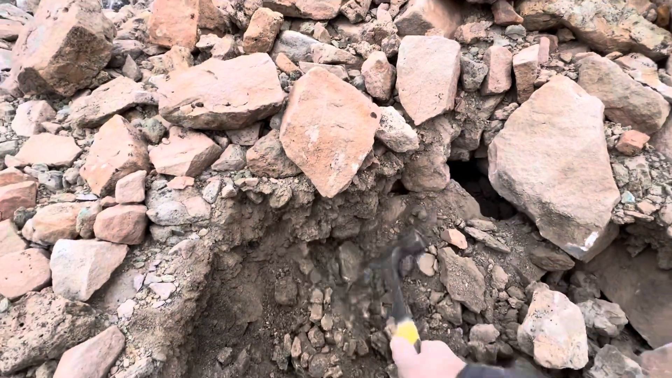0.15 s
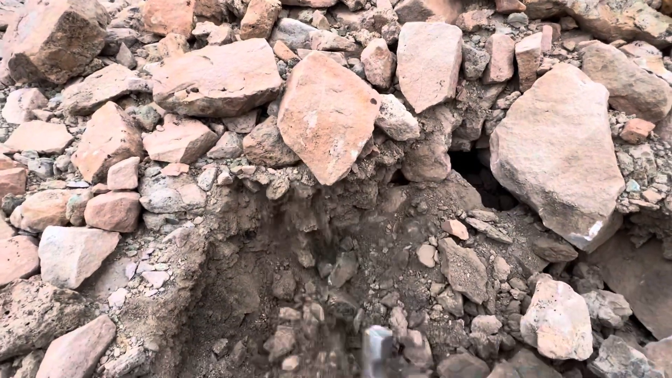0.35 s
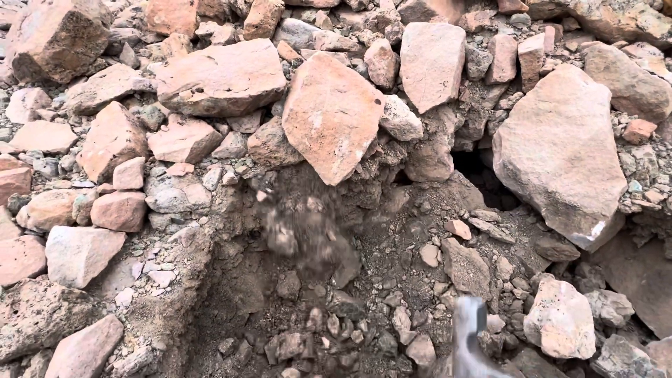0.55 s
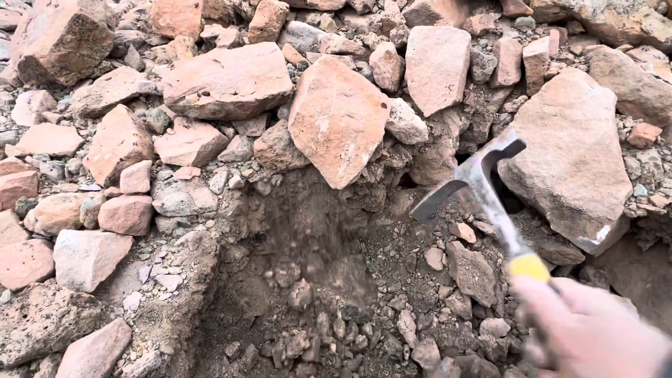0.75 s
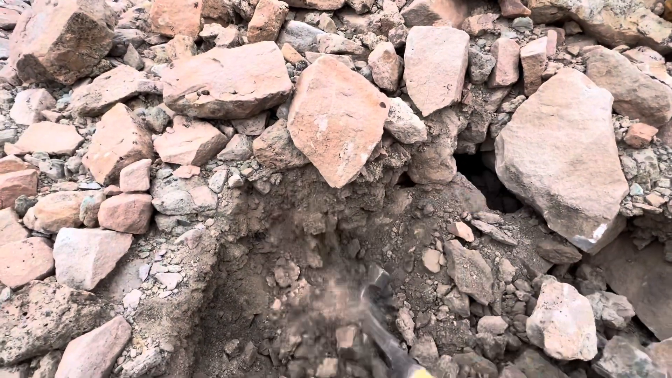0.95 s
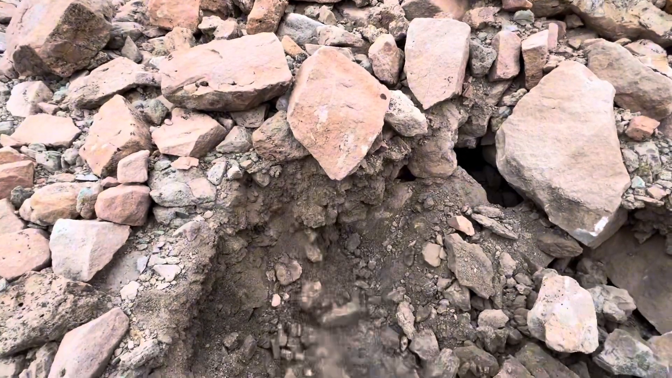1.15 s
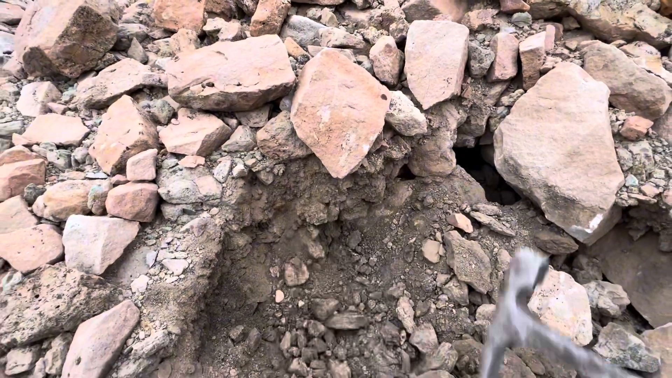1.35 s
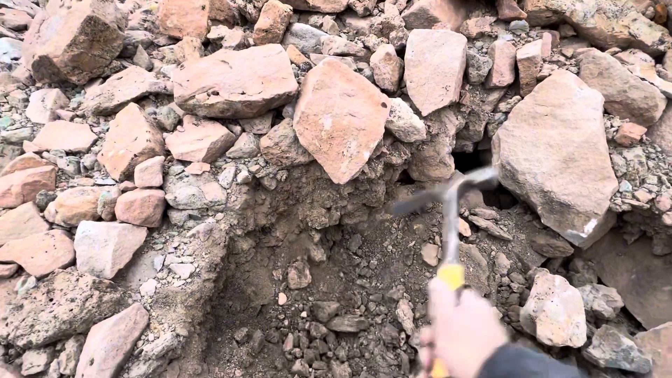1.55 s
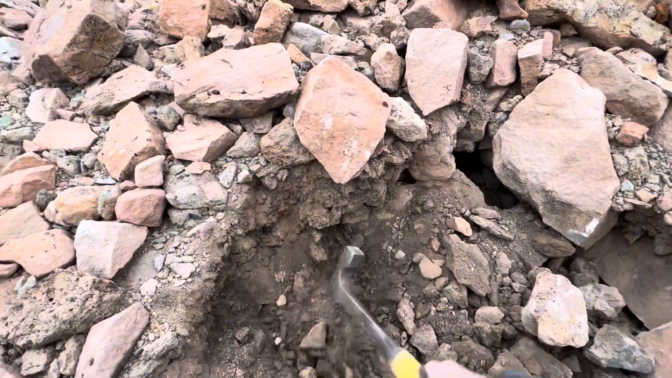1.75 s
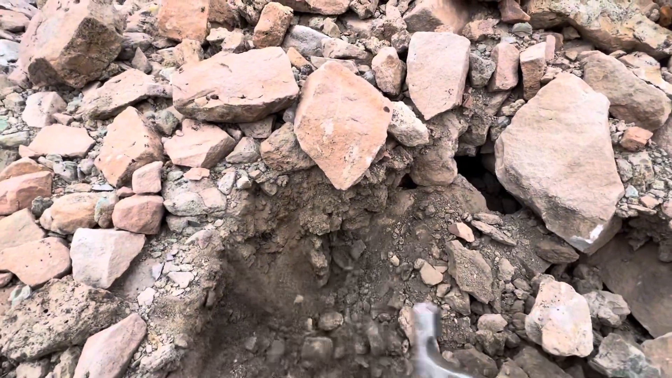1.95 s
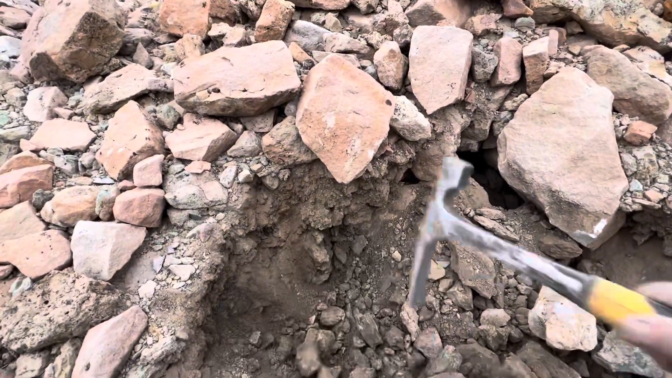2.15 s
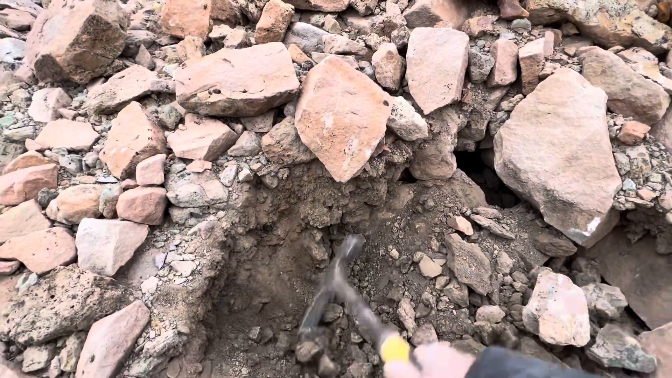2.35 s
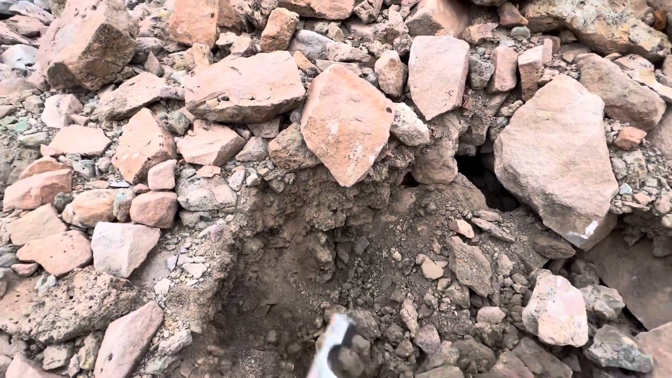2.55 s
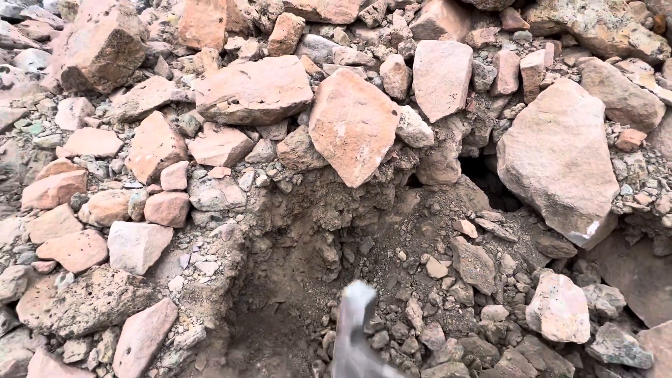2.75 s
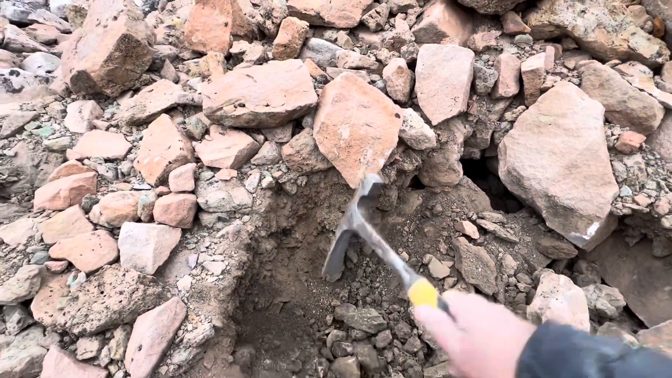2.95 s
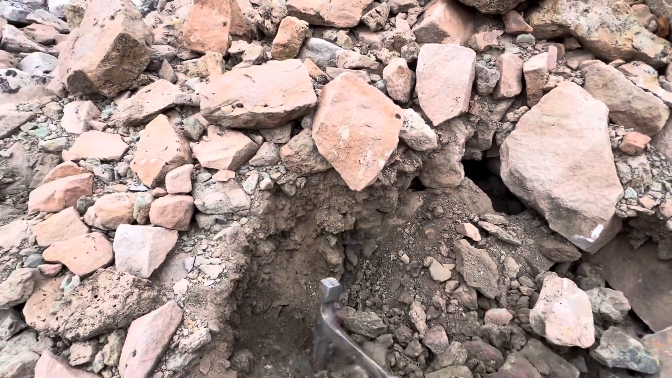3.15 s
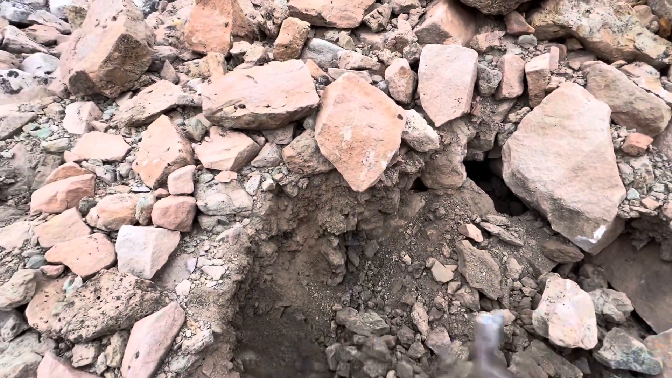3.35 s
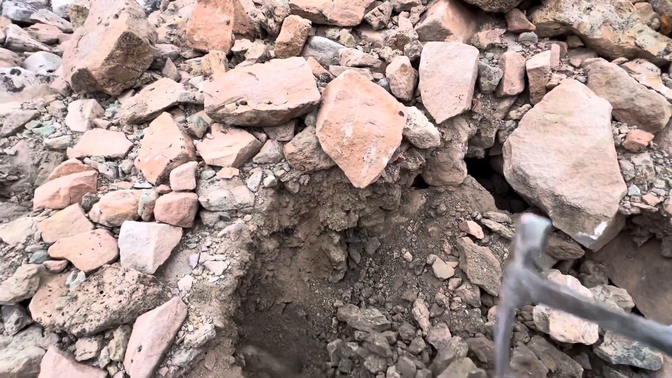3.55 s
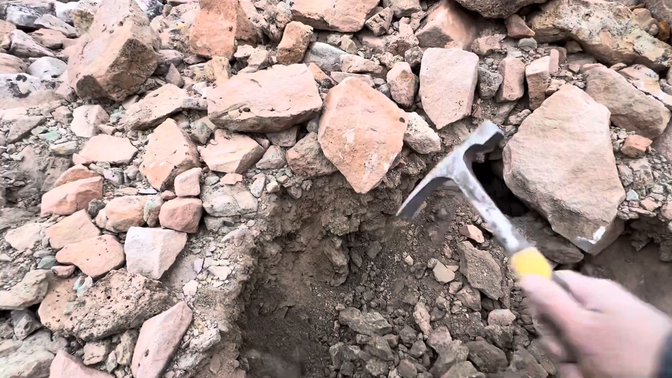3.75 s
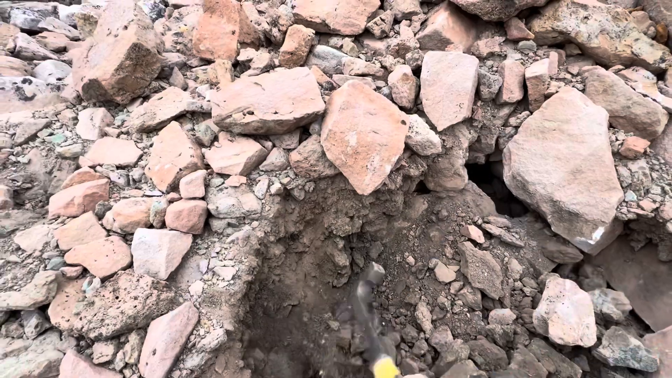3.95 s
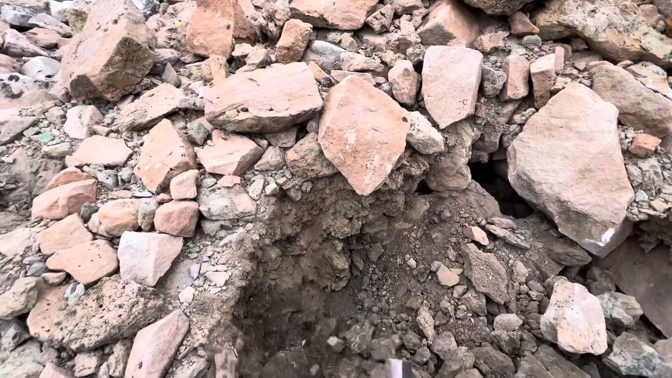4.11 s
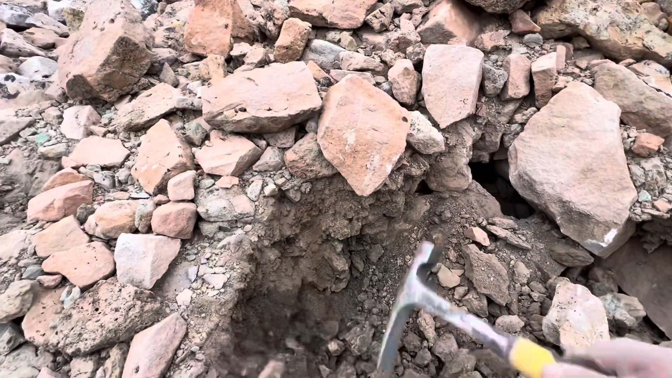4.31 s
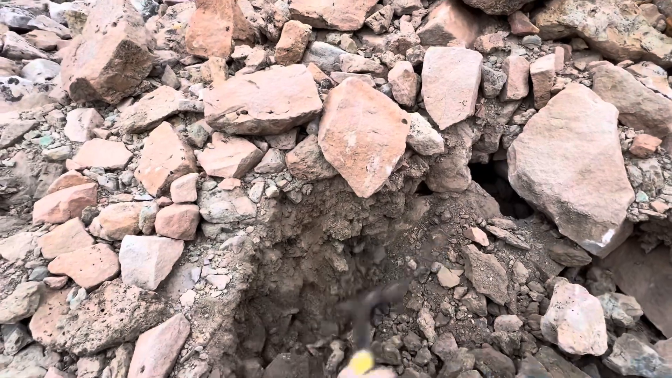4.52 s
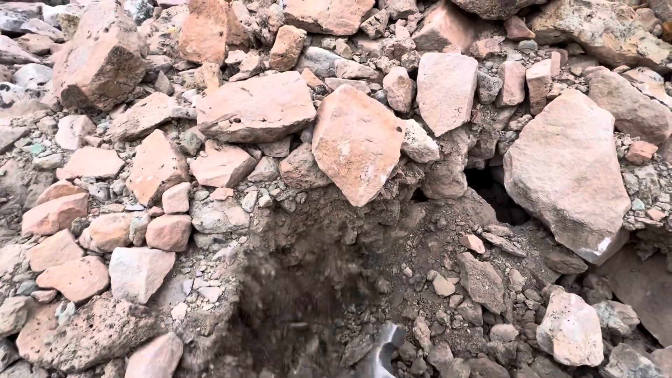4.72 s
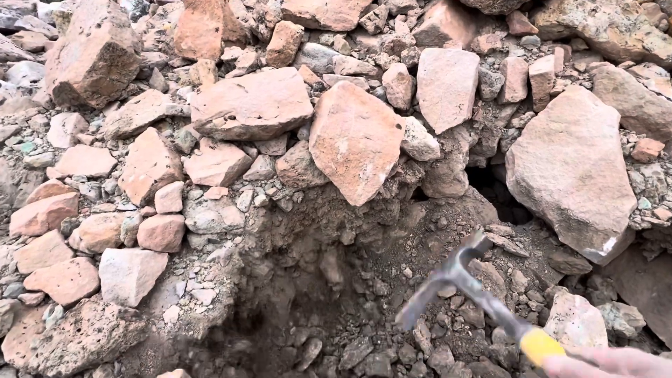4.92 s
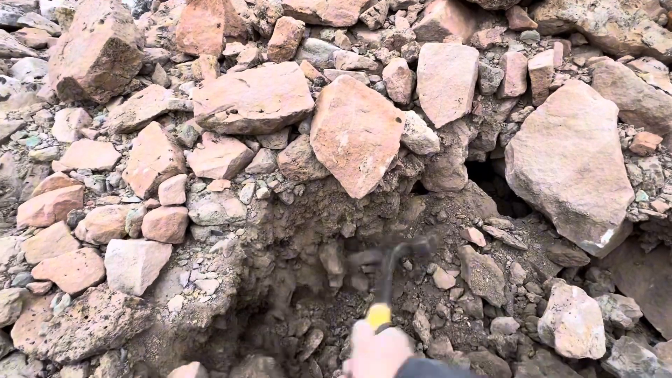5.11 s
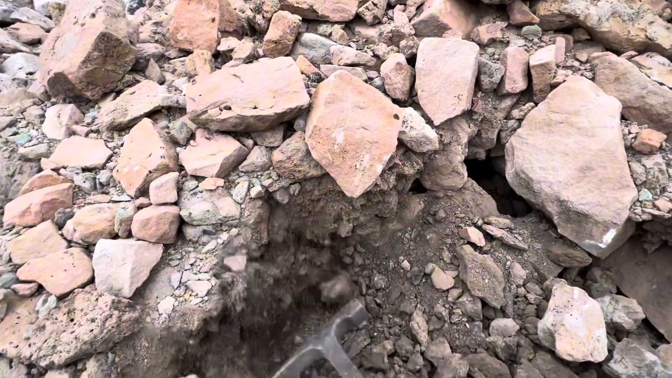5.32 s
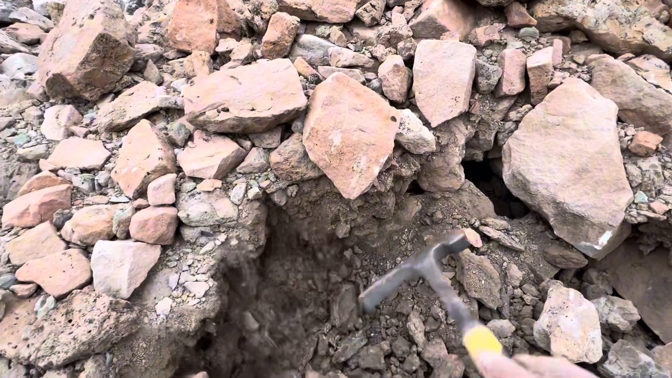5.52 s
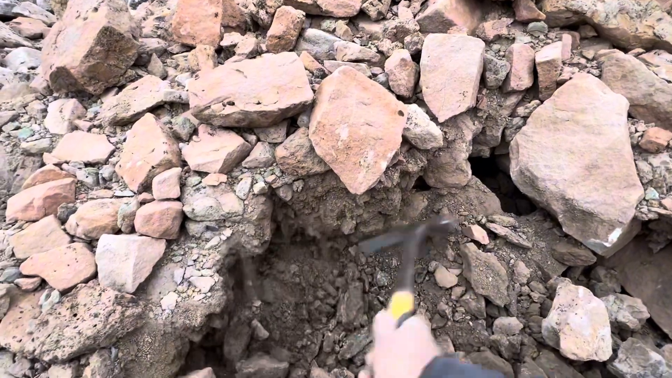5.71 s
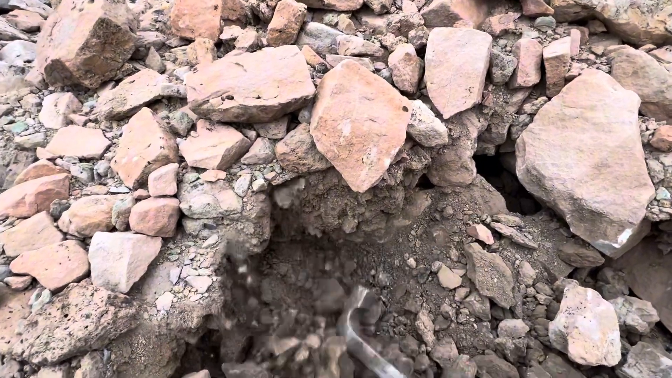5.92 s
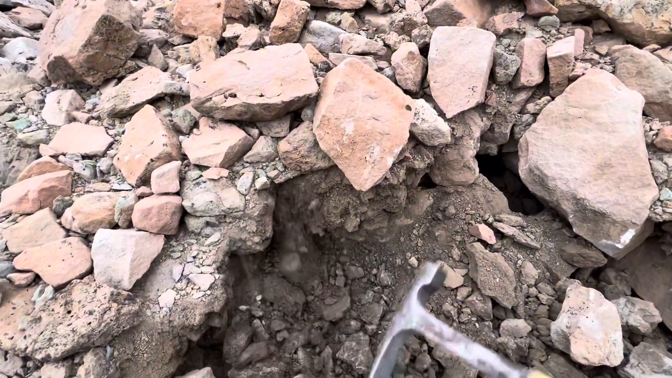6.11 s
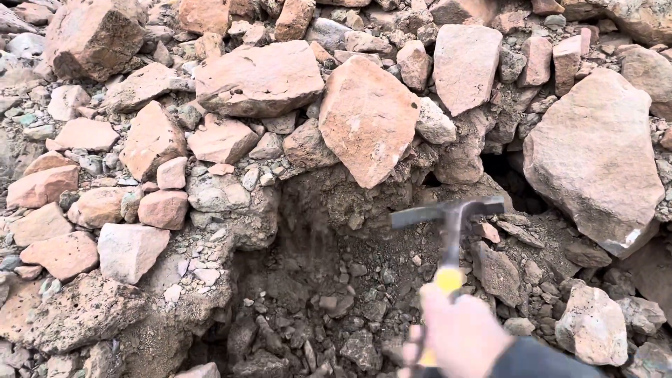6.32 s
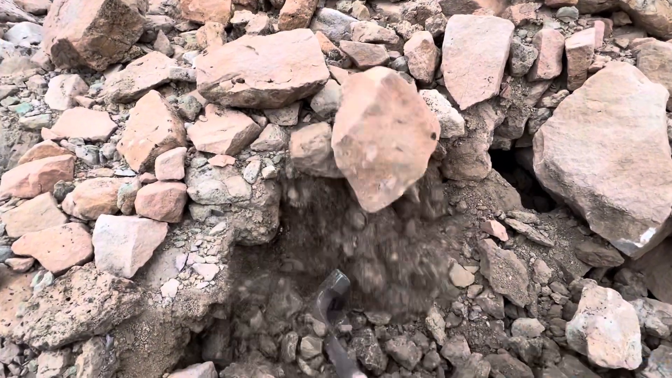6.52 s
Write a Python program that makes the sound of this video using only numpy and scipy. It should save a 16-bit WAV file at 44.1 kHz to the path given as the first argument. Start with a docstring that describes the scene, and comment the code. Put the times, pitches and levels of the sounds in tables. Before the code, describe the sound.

A hand pick digs at stony ground in steady rhythm, heard close and dry. Every blow bites with a hard crack of stone and crunching grit over a soft, sagging thud; the steel head rings only briefly. Dragging scrapes follow, and small slides of gravel and stray pebbles patter down before the next hit. The open air adds only a faint, even hiss, with no echo.

```python
"""Hand pick in stony soil

A steel hand pick chops into stony soil close to a phone, outdoors: each swing crunches in, thuds and is dragged back.
Crunches and running gravel are swarms of tiny damped wavelets mixed with noise; stone clicks and thuds are decaying
sines that drop in pitch. Click taps and crunch forces drive the ringing modes of the pick head. Loosened gravel
trickles down the bank in slides, with stray pebble clicks, over a faint outdoor hiss."""
import sys
import numpy as np
from scipy import signal
from scipy.fft import rfft, irfft, next_fast_len
from scipy.io import wavfile
from scipy.ndimage import map_coordinates

SR = 44100
rng = np.random.default_rng(int(sys.argv[2]) if len(sys.argv) > 2 else 0)


def put_to_file(sound):
    """Save the sound as 16-bit audio at rate SR, in the file named by the first command-line argument."""
    columns = np.atleast_2d(sound).T  # one column per channel
    safe = np.clip(columns, -1, 1)
    whole_steps = np.round(safe * 32767)
    wavfile.write(sys.argv[1], SR, whole_steps.astype(np.int16))


N = 289737

# tone of coarse stone grit: frequency_hz [Hz], gain_db [dB]
GRIT_TONE = [(350, -22), (600, -3), (1200, 0), (2500, -0.5), (4500, 0.5), (6000, -28.5)]
# tone of fine, hissing dust: frequency_hz [Hz], gain_db [dB]
DUST_TONE = [(3500, -15), (5000, 2), (7000, 6), (9000, 3), (12000, -0.5), (16000, -9)]


def amp(db):
    """Linear amplitude for a level in dB."""
    return 10 ** (np.asarray(db) / 20)


def unit(x):
    """x scaled to an rms of 1."""
    return x / np.sqrt(np.mean(x ** 2) + 1e-20)


def filtered(x, response):
    """x times a response given as a function of frequency in Hz."""
    size = next_fast_len(N + SR // 2, True)
    spectrum = rfft(x, size) * response(np.fft.rfftfreq(size, 1 / SR))
    return irfft(spectrum, size)[..., :N]


def coloured(x, points):
    """x through a causal minimum-phase filter drawn through (Hz, dB) points."""
    hz, db = np.transpose(points)
    grid = np.fft.rfftfreq(8192, 1 / SR)
    gain_db = np.interp(np.log(grid + 1), np.log(hz), db)
    # folding the cepstrum forward in time makes the filter causal
    cepstrum = irfft(np.log(amp(gain_db)))
    half = len(cepstrum) // 2
    cepstrum[1:half] *= 2
    cepstrum[half + 1:] = 0
    impulse = irfft(np.exp(rfft(cepstrum)))
    return signal.fftconvolve(x, impulse)[:N]


def wobble(rate):
    """A smooth random curve through rate knots a second."""
    knots = rng.standard_normal(int(N * rate / SR) + 4)
    return map_coordinates(knots, [np.arange(N) * rate / SR])


def grains(count, spread_db, cycles, noise):
    """Tiny stone contacts, each a short damped wavelet of random pitch and size, on a share of plain noise; rms 1."""
    when, pitch, size, sign = rng.random((count, 4)).T
    hz = 400 * 40 ** pitch[:, None]  # 400 Hz to 16 kHz
    t = np.arange(96) / SR
    wavelet = np.sqrt(hz) * np.cos(2 * np.pi * hz * t) * np.exp(-hz * t / cycles)
    strength = amp(-spread_db * np.log(size + 0.032)) * np.sign(sign - 0.5)
    wavelet *= strength[:, None]
    index = (when * N).astype(int)[:, None] + np.arange(len(t))
    patter = np.bincount(index.ravel(), wavelet.ravel(), N + len(t))[:N]
    return unit(unit(patter) + noise * rng.standard_normal(N))


def flows_db():
    """Levels of patter, dust and rumble: each swing sets loose a slide that rises, holds and dies away."""
    # loose gravel running down the bank: full_flow_s [s], hold_s [s], level_db [dB], fall_db_per_s [dB/s],
    # dust_db and rumble_db [dB against the patter]
    slides = [(0.214, 0.19, -36, 45, 0.5, -9), (1.06, 0.15, -41.5, 31, 0.5, -5.5),
              (1.755, 0.11, -37.5, 64, -2, -3), (2.44, 0.12, -39.5, 42, -1, -2.5),
              (3.166, 0.052, -40, 21, -1.5, -3.5), (3.97, 0.02, -41.5, 51, 2.5, -3),
              (4.58, 0.34, -41, 55, 1, -5.5), (5.152, 0.24, -42.5, 73, 1.5, -3.5),
              (5.847, 0.067, -34.5, 50, 0, -8), (6.462, 0.049, -36, 40, -4, -7)]
    # what still runs between slides: patter_db, dust_db, rumble_db [dB]
    settled = [-58, -51, -64]
    rise_db_per_s, dust_lag_s, rumble_lead_s = 90, 0.032, 0.023
    t = np.arange(N) / SR - np.array([[0], [dust_lag_s], [-rumble_lead_s]])
    power = amp(settled)[:, None] ** 2
    for full_flow_s, hold_s, level_db, fall_db_per_s, dust_db, rumble_db in slides:
        rise_db = rise_db_per_s * np.maximum(full_flow_s - t, 0)
        fall_db = fall_db_per_s * np.maximum(t - full_flow_s - hold_s, 0)
        balance_db = np.array([[0], [dust_db], [rumble_db]])
        power = power + amp(level_db - rise_db - fall_db + balance_db) ** 2
    return 10 * np.log10(power)


def trickle():
    """Gravel and a few larger pebbles patter over a hiss of dust and a lumpy rumble of sliding soil."""
    # tone of sliding soil: frequency_hz [Hz], gain_db [dB]
    rumble_tone = [(35, -26), (70, -3), (140, -2), (300, -5.5), (600, -15.5), (900, -27)]
    patter_db, dust_db, rumble_db = flows_db()
    gravel = grains(count=12000, spread_db=3, cycles=1.2, noise=1.0)
    pebbles = grains(count=600, spread_db=6.5, cycles=1.1, noise=0)
    lumps = wobble(35)  # shared, so all three layers surge together

    patter_db = patter_db + 2.17 * lumps + 1.4 * wobble(100)
    patter = amp(patter_db) * unit(coloured(gravel + 0.34 * pebbles, GRIT_TONE))
    dust_db = dust_db + 1.2 * lumps + 1.6 * wobble(90)
    hiss = amp(dust_db) * unit(coloured(gravel + 0.4 * pebbles, DUST_TONE))
    rumble_db = rumble_db + 3.9 * lumps + 1.85 * wobble(17)
    rumble = amp(rumble_db) * unit(coloured(rng.standard_normal(N), rumble_tone))
    return patter + hiss + rumble


def air():
    """A faint even outdoor hiss: steady coloured noise."""
    # tone of the open air: frequency_hz [Hz], gain_db [dB]
    air_tone = [(40, -10), (130, 7), (470, -18), (1300, -9), (4600, -5), (8300, -10), (16000, -0.5)]
    return amp(-50) * unit(coloured(rng.standard_normal(N), air_tone))


def strays(count):
    """Rows of pebble clicks at random moments, louder while more gravel runs."""
    loudest_db, range_db = -25, 6.5  # loudest click at the mean flow level
    growth = 0.86  # dB louder for each dB more gravel
    lowest_hz, pitch_ratio, ring_db = 1200, 6, -28
    patter_db = flows_db()[0]
    ceiling_db = loudest_db + growth * (patter_db - patter_db.mean())
    rows = []
    for when, size, pitch in rng.random((count, 3)):
        level_db = ceiling_db[int(when * N)] - range_db * size
        rows.append((when * N / SR, level_db, lowest_hz * pitch_ratio ** pitch, ring_db, "flat"))
    return rows


def clicks():
    """A stone clicks for a cycle or two, its pitch dropping, sheds a puff of grit and taps the steel."""
    # single stone clicks: start_s [s], level_db [relative dB], pitch_hz [Hz, where the drop settles],
    # ring_db [dB of steel tap against the click], side of the head that is met
    stone_clicks = [(0.031, -18, 3300, -23, "flat"), (0.119, -14, 2480, -17, "edge"),
                    (0.149, 4, 2070, -21, "flat"), (0.2313, -13, 2020, -20, "flat"),
                    (0.354, -15, 2490, -18.5, "edge"), (0.4199, -13, 1620, -24, "flat"),
                    (0.481, -22, 3000, -14, "flat"), (0.5745, -13, 1630, -23, "flat"),
                    (0.6927, -15.5, 1200, -34, "flat"), (0.8065, -20.5, 3700, -27.5, "flat"),
                    (0.8278, -19, 6800, -19, "edge"), (0.8395, -2.5, 2930, -21, "edge"),
                    (0.8487, -2.5, 950, -18, "flat"), (1.1067, -4.5, 1760, -28, "edge"),
                    (1.2652, -12, 2820, -18, "edge"), (1.3491, -15.5, 3600, -29, "flat"),
                    (1.358, -21, 1410, -25, "flat"), (1.4438, -21, 2170, -34, "flat"),
                    (1.6106, -18, 2480, -30, "flat"), (1.8283, -7, 2720, -10, "flat"),
                    (1.927, -10, 4040, -15, "flat"), (2.0272, -20, 1600, -17, "flat"),
                    (2.052, -18, 1450, -18, "flat"), (2.0655, -25, 3200, -19, "edge"),
                    (2.1587, -19.5, 5700, -35, "flat"), (2.1966, -23.5, 3080, -30, "flat"),
                    (2.2228, -16.5, 8200, -41, "flat"), (2.2292, -24, 1910, -31, "flat"),
                    (2.2727, -26.5, 3260, -28, "flat"), (2.3409, 3, 2880, -39, "flat"),
                    (2.3697, -5, 1050, -22, "edge"), (2.3736, -4, 1780, -20, "flat"),
                    (2.3998, -11, 5560, -23, "flat"), (2.485, -7.5, 3030, -7, "flat"),
                    (2.5183, -1.5, 2620, -37, "flat"), (2.5946, -19, 1950, -28, "flat"),
                    (2.608, -18, 5300, -25, "flat"), (2.7044, -17.5, 3700, -15.5, "flat"),
                    (2.771, -26, 2000, -30, "flat"), (2.8101, -17.5, 1200, -19, "flat"),
                    (2.825, -27, 1070, -36, "flat"), (2.889, -25, 790, -36, "flat"),
                    (3.0424, -12, 3500, -27, "flat"), (3.0458, -8, 3800, -13, "flat"),
                    (3.0622, 6.5, 3100, -27, "flat"), (3.1965, -12.5, 3330, -33, "flat"),
                    (3.324, -12, 3100, -19, "edge"), (3.331, -3.5, 3700, -21, "edge"),
                    (3.377, -3, 3750, -22, "edge"), (3.402, -11.5, 2300, -9, "flat"),
                    (3.5124, -20.5, 1490, -28, "flat"), (3.519, -18, 2780, -22, "flat"),
                    (3.555, -12, 5900, -37, "flat"), (3.629, -22.5, 940, -29, "flat"),
                    (3.673, -24.5, 2100, -21.5, "flat"), (3.715, -21.5, 2540, -21, "flat"),
                    (3.8764, -10, 2520, -4.5, "flat"), (3.8932, -7.5, 1360, -16, "flat"),
                    (4.0826, -15, 5800, -21, "flat"), (4.0925, -7.5, 2430, -4.5, "flat"),
                    (4.1075, -16, 2770, -53, "flat"), (4.2998, -24, 7400, -23, "flat"),
                    (4.4905, -9, 1900, -15, "flat"), (4.508, -16, 2830, 1, "flat"),
                    (4.5268, 3, 2070, -21, "flat"), (4.579, -14, 2170, -16, "flat"),
                    (4.611, -10, 1860, -37, "flat"), (4.6617, -16, 2420, -11, "flat"),
                    (4.7462, -25.5, 3240, -8.5, "edge"), (4.7731, -15.5, 2280, -39, "flat"),
                    (4.8203, -17.5, 2300, -30, "flat"), (4.8992, -20, 3500, -23, "flat"),
                    (4.939, -10.5, 850, -39, "flat"), (5.0555, -19.5, 2110, -26, "flat"),
                    (5.097, -11, 2300, -9, "flat"), (5.107, 0.5, 2530, -10, "flat"),
                    (5.132, -10, 1800, -21, "flat"), (5.215, -10, 2740, -3.5, "flat"),
                    (5.2458, -14.5, 2350, -1.5, "flat"), (5.2924, -11.5, 2370, -9, "flat"),
                    (5.3055, -11, 2180, -27, "edge"), (5.3945, -18.5, 2700, -21, "flat"),
                    (5.4337, -17, 1850, -37, "flat"), (5.682, -24, 2550, -30, "flat"),
                    (5.7215, -4, 3680, -6.5, "flat"), (5.734, -4.5, 2030, -22, "flat"),
                    (5.8175, -3.5, 710, -24, "flat"), (5.987, -4.5, 1510, -42, "flat"),
                    (6.0071, -10.5, 1450, -27, "edge"), (6.0447, -4, 5900, -28, "flat"),
                    (6.1043, -18, 1580, -34, "flat"), (6.1228, -21, 1010, -36, "flat"),
                    (6.2595, -17, 5250, -40, "flat"), (6.3139, -5.5, 2430, -15.5, "flat"),
                    (6.3766, -3, 5100, -29, "edge"), (6.3985, 3, 5970, -34, "flat"),
                    (6.3984, 6, 4600, -15.5, "flat"), (6.414, -1, 2520, -17, "flat"),
                    (6.4273, -2, 3200, -12, "flat"), (6.4617, -8, 1020, -34, "edge")]
    stones, flat, edge = np.zeros((3, N + SR))
    t = np.arange(SR // 50) / SR
    for start_s, level_db, pitch_hz, ring_db, side in stone_clicks + strays(count=150):
        cycles = pitch_hz * t
        dropping = cycles + 0.05 * (1 - np.exp(-cycles / 0.13))
        knock = np.sin(2 * np.pi * dropping) * np.exp(-cycles / 0.84)
        # the smaller of the two stones answers higher
        chip = 0.45 * np.sin(2 * np.pi * rng.uniform(1.1, 2.64) * cycles) * np.exp(-cycles / 0.53)
        puff = 0.11 * amp(-60 * t / 0.02) * rng.standard_normal(len(t))
        attack = np.clip(cycles / 0.39, 0, 1)
        i = round(start_s * SR)
        stones[i:i + len(t)] += amp(level_db + 3.0) * ((knock + chip) * attack + puff)

        # the contact chatters for a millisecond or two, so the ring swells rather than jumps
        chatter = t * np.exp(-t / 0.00067) * rng.standard_normal(len(t))
        chatter = 0.96 * chatter / np.linalg.norm(chatter)
        chatter[round(0.0004 * SR)] += 0.7  # the main tap
        met = flat if side == "flat" else edge
        met[i:i + len(t)] += amp(level_db + ring_db + 19.5) * chatter
    return np.array([stones, flat, edge])[:, :N]


def steel(flat, edge):
    """The pick head rings with other mode strengths for forces on its flat and on its edge."""
    # modes of the pick head: mode_hz [Hz], t60_s [s], flat_db and edge_db [dB when met on that side]
    modes = [(2297, 0.037, -10, -42), (2473, 0.019, -1, -48), (2720, 0.036, -14.5, -38),
             (3895, 0.04, -38, 6), (5740, 0.009, -7, -1), (6853, 0.028, -12.5, 4),
             (7820, 0.0098, -11.5, -12), (8940, 0.018, -16, -11), (14300, 0.059, -20, -18)]
    ring = 0
    for mode_hz, t60_s, flat_db, edge_db in modes:
        decay = amp(-60 / (t60_s * SR))  # per sample
        # the point of contact wanders, so each mode is caught more or less well
        catch = amp(2.05 * wobble(25))
        force = (amp(flat_db) * flat + amp(edge_db) * edge) * catch
        pole = decay * np.exp(2j * np.pi * mode_hz / SR)
        mode = signal.lfilter([np.sqrt(2 - 2 * decay ** 2)], [1, -pole], force)
        # soil clinging to the moving head makes the pitch waver
        ring = ring + (mode * np.exp(1.2j * wobble(70))).imag
    return ring


def crunches():
    """Dense grit breaks under the blade and shakes the soil; returns the sound and the forces on the steel."""
    # pick grinding through soil: start_s [s], length_s [s, the 21 ms fade-out ends 10 ms after it],
    # level_db [relative dB], fade_db [dB fallen over the length],
    # soil_db, flat_db, edge_db [relative dB of soil body and steel forces]
    grinds = [(0.117, 0.027, -30, 9, -12, -4, 0), (0.143, 0.039, -28.5, 23, -3, 0, -22),
              (0.239, 0.096, -48.5, 8, -9, 6, 2), (0.317, 0.059, -44.5, -2, -15, 7, -2.5),
              (0.447, 0.049, -50, -2, -21, 10, 1), (0.538, 0.017, -51, -4, -20, -22, 11.5),
              (0.836, 0.029, -19, 9, -3, -15, -14), (0.869, 0.1, -35.5, 19.5, -4, -12, -22),
              (1.015, 0.048, -48.5, -4, -28, 11.5, 1), (1.072, 0.055, -26.5, -8.5, -16.5, -9, -16),
              (1.137, 0.028, -31.5, -10, -21, -22, -32), (1.198, 0.061, -48.5, 4, -18, 7, -1),
              (1.282, 0.04, -45.5, 1, -18, -27, 7.5), (1.342, 0.033, -37.5, 8, -32, -2.5, -32),
              (1.61, 0.1, -32.5, 30, -7.5, -8, -16), (1.787, 0.048, -31.5, -11, -15, 0, -8.5),
              (1.913, 0.044, -29, 1, -30, -15, -32), (1.964, 0.029, -35, -17, -54, -26, -0.5),
              (2.059, 0.033, -46.5, 7, -22, 0, 1), (2.339, 0.036, -19, -5.5, -4, -32, -30),
              (2.475, 0.022, -32.5, 0, -20, 1, -12), (2.499, 0.024, -22, -9, -10.5, -11, -28),
              (2.576, 0.024, -28, -13.5, -48, -7, -14), (2.604, 0.012, -30, 13, -4, -13, -12),
              (2.683, 0.034, -50, -5, -15, -15, -8), (3.042, 0.025, -19, 1.5, -8, -7, -14),
              (3.186, 0.0064, -38, -9, -12, 2, -6), (3.287, 0.076, -32.5, 4, -36, -19, -4),
              (3.356, 0.041, -35.5, -3, -35, -15, -12), (3.398, 0.026, -28.5, 25, -23, -5.5, -8),
              (3.465, 0.03, -53, 0, -15, -17, 4.5), (3.87, 0.02, -30, -24.5, 2.5, 3.5, -18),
              (3.912, 0.045, -38, -2, -3, 1.5, -21), (3.989, 0.026, -37, -3, -14, 3.5, -9),
              (4.09, 0.1, -45.5, 25, -6, 9.5, -9.5), (4.188, 0.022, -51.5, 10, -13, -4, 4.5),
              (4.447, 0.039, -37.5, -19, -14, -5.5, -22), (4.488, 0.06, -24.5, -1.5, -9, -1, -27),
              (4.595, 0.043, -35.5, -3, -9, 1, -32), (4.656, 0.052, -53, 2, -13, -9, 6),
              (5.102, 0.029, -18, -3, -11, -7, -26), (5.169, 0.036, -27.5, 6, -5.5, -2.5, -11),
              (5.213, 0.026, -23, 1, -4.5, -8, -32), (5.243, 0.055, -30.5, 3, -6.5, -12, -32),
              (5.334, 0.031, -57, 0, -17, -20, 9), (5.714, 0.017, -22.5, -17.5, -5.5, -31, -34),
              (5.809, 0.042, -33, 1, -3, -2, -19), (5.983, 0.033, -31, 20.5, -31, -7, -30),
              (6.306, 0.02, -30.5, 4, -4.5, -5, -34), (6.347, 0.026, -31, -17, -9, -2, -26),
              (6.395, 0.0087, -17.5, 13, -21, -15, -32), (6.41, 0.01, -15, -6, -3.5, -4, -18),
              (6.431, 0.047, -32, 9, -3, -3.5, -16)]
    # tone of the shaken soil body: frequency_hz [Hz], gain_db [dB]
    soil_tone = [(120, -19.5), (250, 11.5), (550, 7.5), (900, -44)]
    levels = np.zeros((5, N + SR))
    for start_s, length_s, level_db, fade_db, soil_db, flat_db, edge_db in grinds:
        t = np.arange(round((length_s + 0.01) * SR)) / SR
        attack = np.clip(t / 0.0026, 0, 1)
        release = np.clip((t[-1] - t) / 0.021, 0, 1)
        shape = amp(level_db + fade_db * (0.5 - t / length_s)) * attack * release
        treble_db = -3.5 - 0.1 * soil_db  # more soil body dulls the treble
        layers_db = [-1.5, treble_db, soil_db, flat_db, edge_db]
        levels[:, round(start_s * SR):][:, :len(t)] += amp(layers_db)[:, None] * shape
    grit, dust, soil, flat, edge = levels[:, :N]

    force = grains(count=14000, spread_db=7.0, cycles=1.0, noise=0.7)
    broken = grit * unit(coloured(force, GRIT_TONE)) + dust * unit(coloured(force, DUST_TONE))
    body = soil * unit(coloured(force, soil_tone))
    shaking = amp(-1.5) * unit(force + 1.2 * rng.standard_normal(N))
    return np.array([broken + body, flat * shaking, edge * shaking])


def thuds():
    """Soft low pushes whose pitch sags as the soil gives, each with a dull shudder that starts with it and fades."""
    # the ground answers a blow: blow_s [s], level_db [relative dB], pitch_hz [Hz, sags from 1.18 to 0.7 of it],
    # shudder_t60_s [s, before 33 ms is added]
    blows = [(0.153, -24, 196, 0.16), (0.85, -31, 198, 0.063), (0.88, -29.5, 175, 0.39),
             (1.101, -29, 113, 0.27), (1.66, -21.5, 165, 0.23), (1.775, -26, 150, 0.063),
             (2.344, -22, 156, 0.34), (2.371, -18.5, 210, 0.031), (2.607, -32, 208, 0.092),
             (3.067, -17.5, 145, 0.035), (3.883, -34, 176, 0.49), (3.899, -21, 152, 0.025),
             (4.496, -28, 154, 0.14), (4.531, -29, 160, 0.13), (5.118, -24.5, 170, 0.4),
             (5.14, -17, 145, 0.091), (5.174, -28, 192, 0.08), (5.241, -32.5, 139, 0.18),
             (5.741, -17.5, 172, 0.033), (5.789, -32, 162, 0.082), (5.823, -24, 132, 0.05),
             (6.319, -29.5, 132, 0.12), (6.422, -22, 130, 0.096)]
    # tone of the shuddering bank: frequency_hz [Hz], gain_db [dB]
    bank_tone = [(35, -50), (55, -1.5), (120, 4), (250, -2.5), (450, -29.5)]
    ground, shudder = np.zeros((2, N + SR))
    t = np.arange(SR // 3) / SR
    for blow_s, level_db, pitch_hz, shudder_t60_s in blows:
        turns = pitch_hz * (0.7 * t + 0.0076 * (1 - np.exp(-t / 0.016)))
        rise = amp(level_db) * np.clip(t / 0.0059, 0, 1)
        start = round((blow_s - 0.003) * SR)  # push and shudder begin 3 ms early
        ground[start:][:len(t)] += rise * amp(8.5 - 60 * t / 0.052) * np.sin(2 * np.pi * turns)
        shudder[start:][:len(t)] += rise * amp(-5 - 60 * t / (shudder_t60_s + 0.033))
    return ground[:N] + shudder[:N] * unit(coloured(rng.standard_normal(N), bank_tone))


def scene():
    """Rubble, ringing steel, thuds, running gravel and air, summed to one channel."""
    rubble, flat, edge = crunches() + clicks()
    return (rubble + steel(flat, edge) + thuds() + trickle() + air())[None]


def record(dry):
    """The phone's microphone shapes the tone, rounds off the tallest peaks and keeps nothing above its band limit."""
    # microphone response: frequency_hz [Hz], gain_db [dB]
    mic_tone = [(25, -66), (45, -3.5), (60, -2.5), (8500, -5.5), (9500, -7), (11000, -19), (13000, -17.5),
                (15200, -10), (16000, -20)]
    band_limit_hz = 15900
    heard = coloured(dry[0], mic_tone)
    heard = heard / (1 + abs(heard / 0.68) ** 4) ** (1 / 4)  # peaks bend over towards 0.68
    return filtered(heard, lambda hz: hz < band_limit_hz)[None]


dry = scene()
out = record(dry)
put_to_file(out)
```